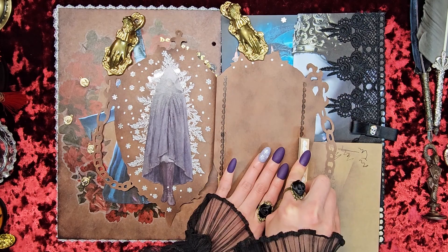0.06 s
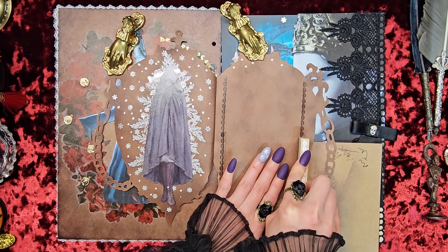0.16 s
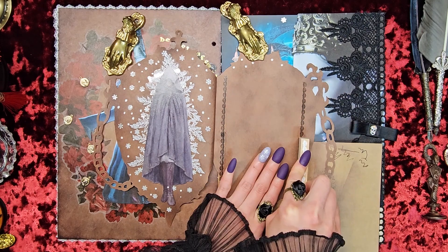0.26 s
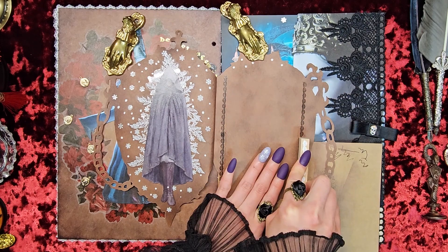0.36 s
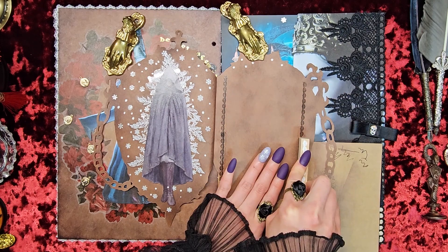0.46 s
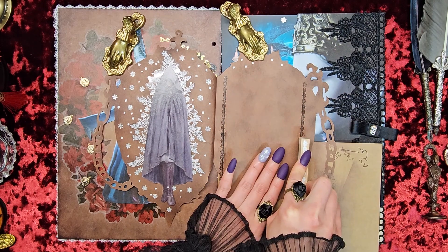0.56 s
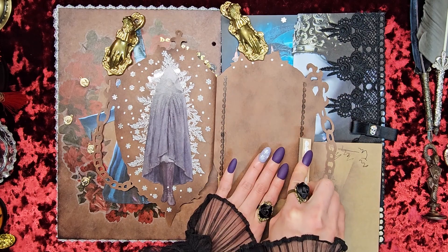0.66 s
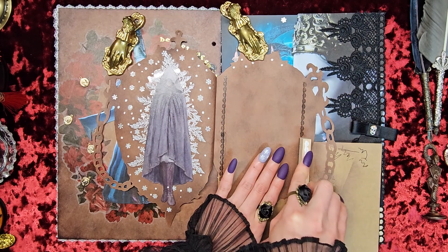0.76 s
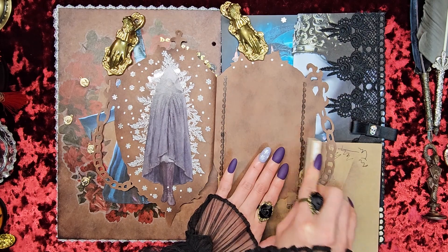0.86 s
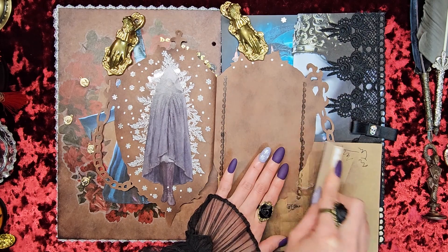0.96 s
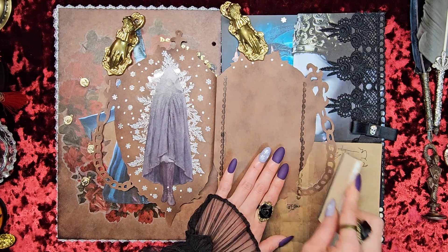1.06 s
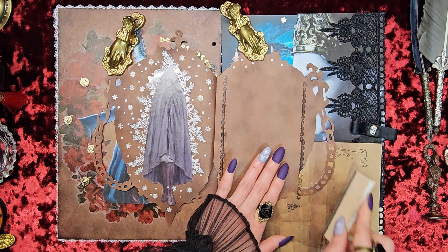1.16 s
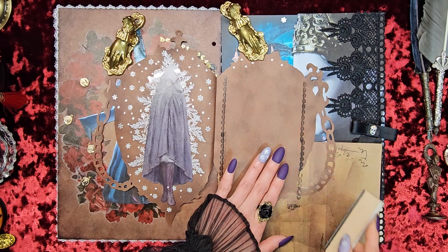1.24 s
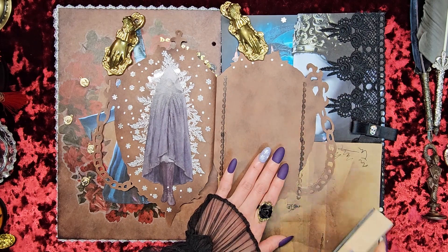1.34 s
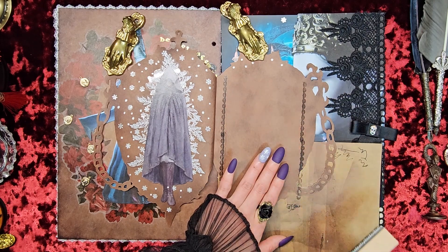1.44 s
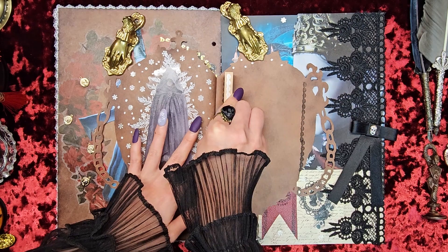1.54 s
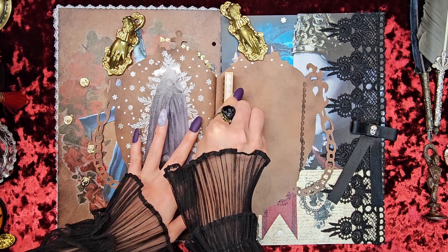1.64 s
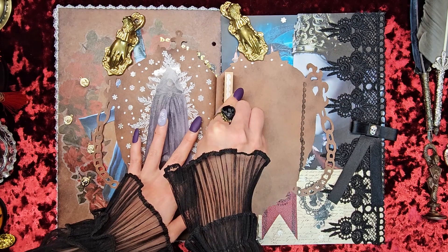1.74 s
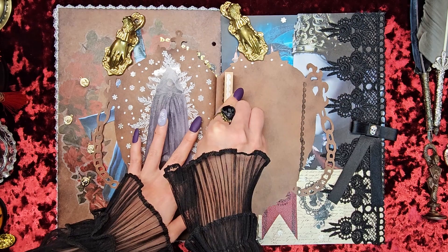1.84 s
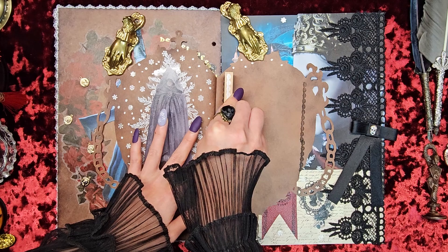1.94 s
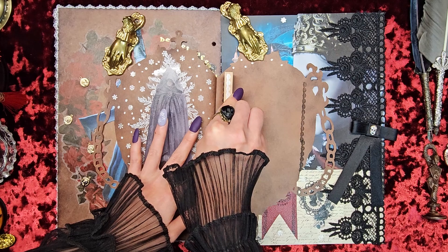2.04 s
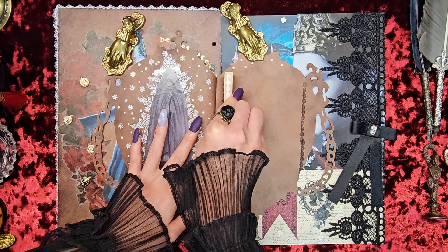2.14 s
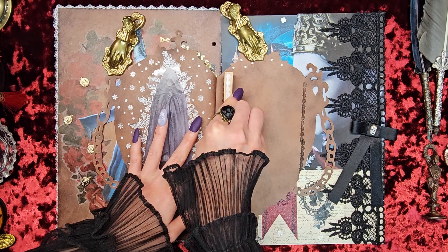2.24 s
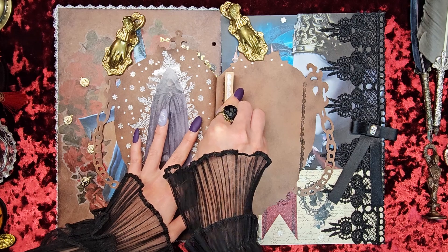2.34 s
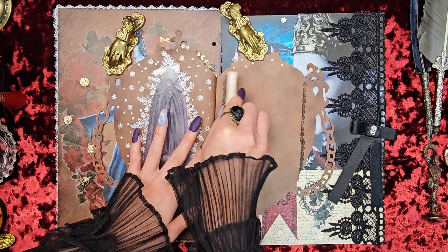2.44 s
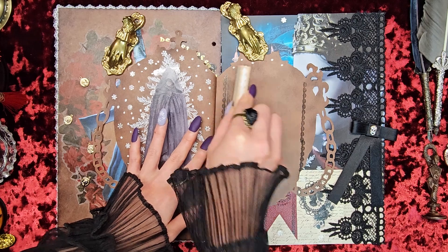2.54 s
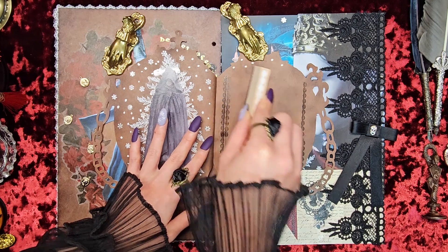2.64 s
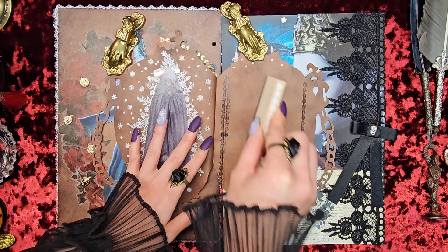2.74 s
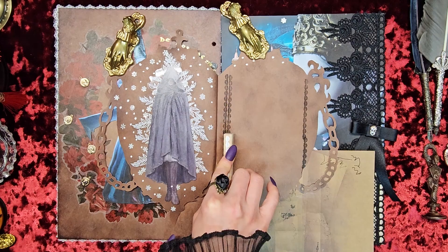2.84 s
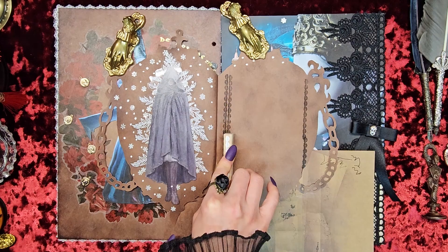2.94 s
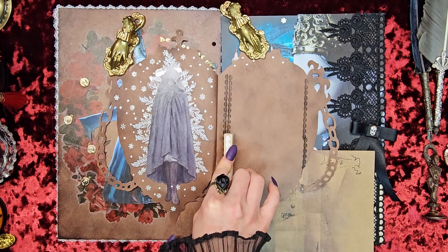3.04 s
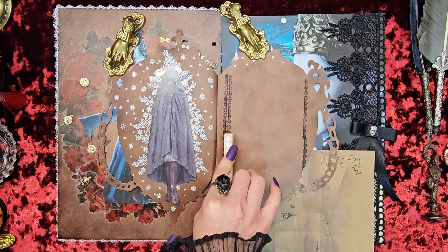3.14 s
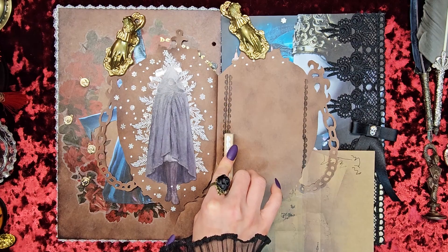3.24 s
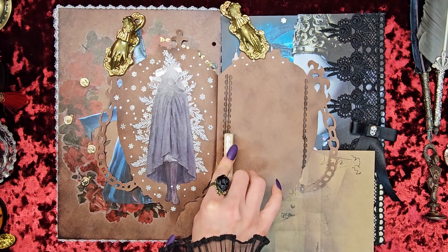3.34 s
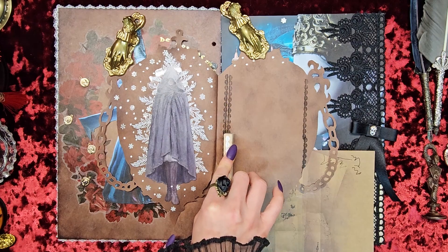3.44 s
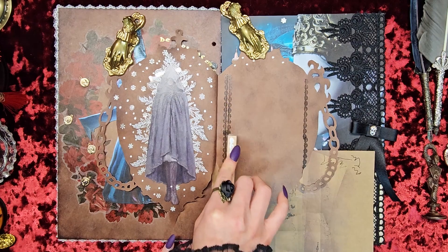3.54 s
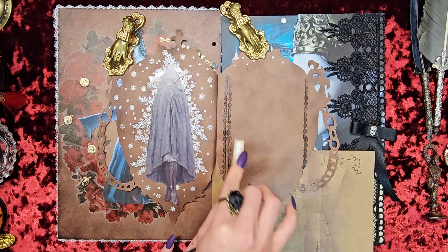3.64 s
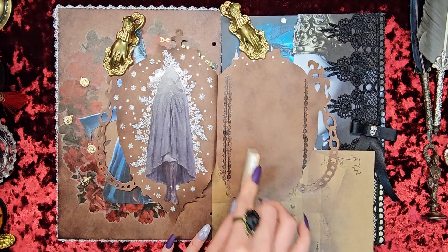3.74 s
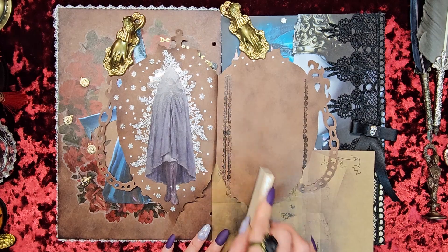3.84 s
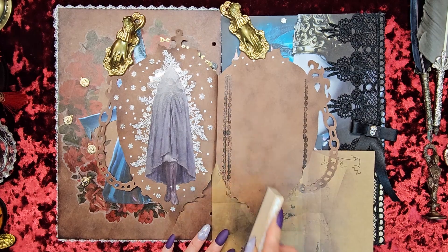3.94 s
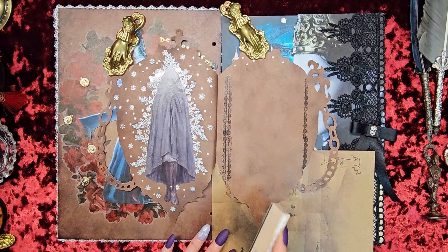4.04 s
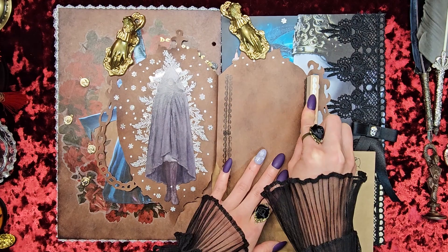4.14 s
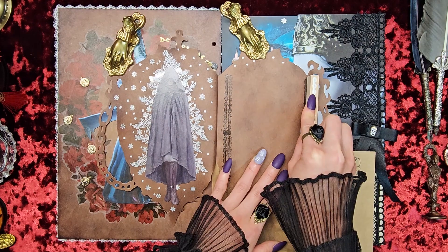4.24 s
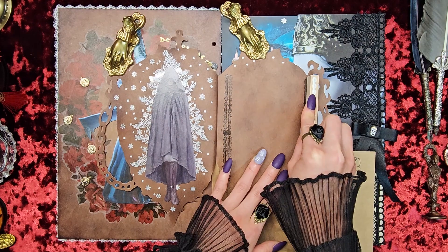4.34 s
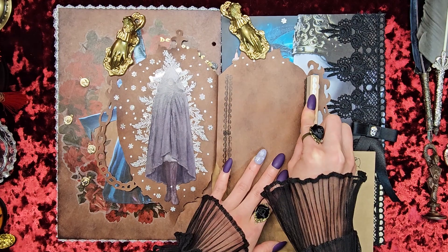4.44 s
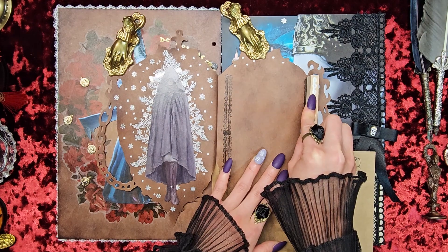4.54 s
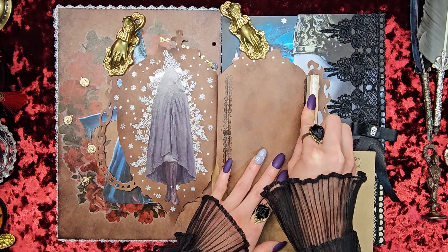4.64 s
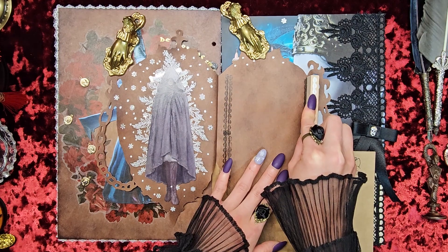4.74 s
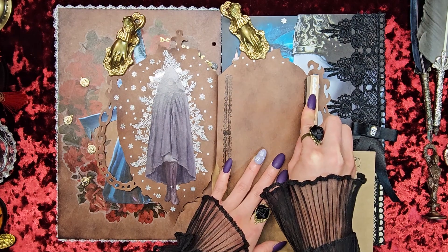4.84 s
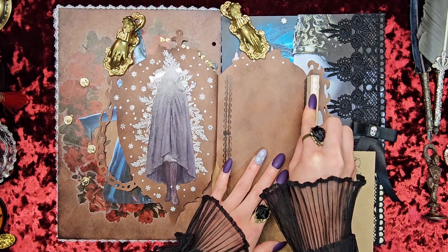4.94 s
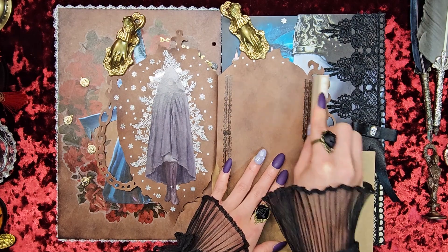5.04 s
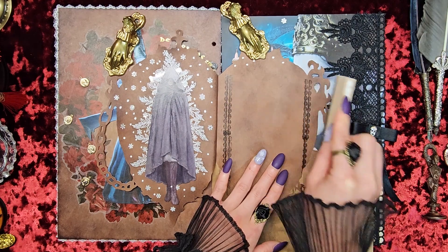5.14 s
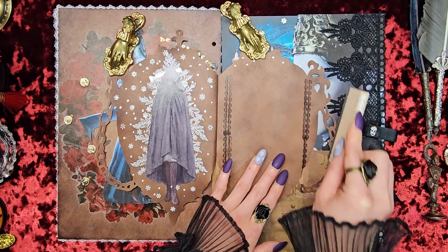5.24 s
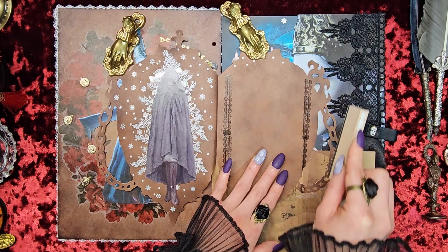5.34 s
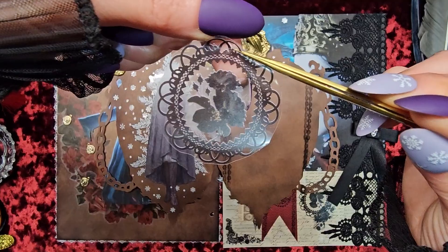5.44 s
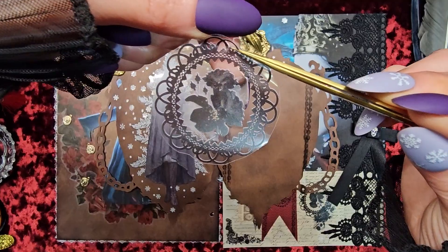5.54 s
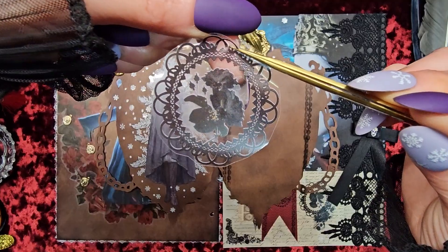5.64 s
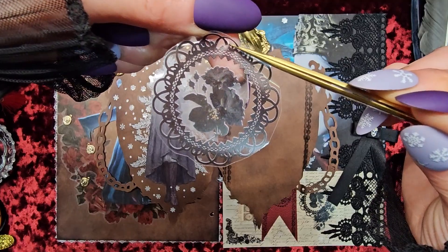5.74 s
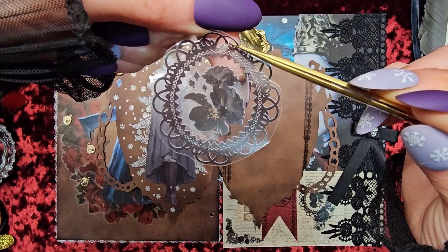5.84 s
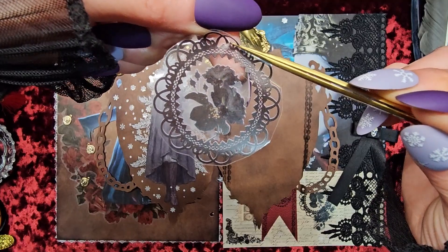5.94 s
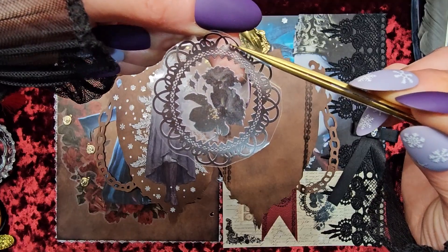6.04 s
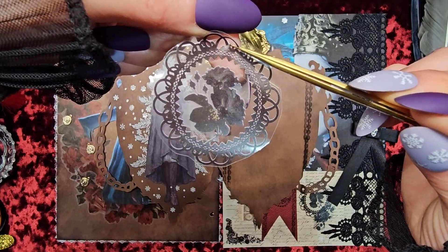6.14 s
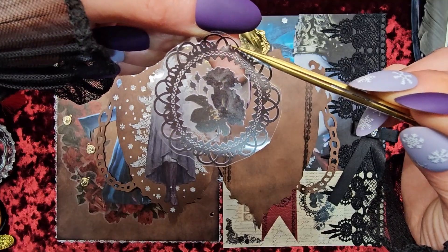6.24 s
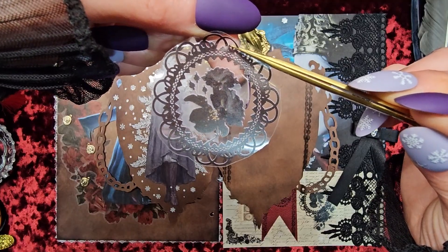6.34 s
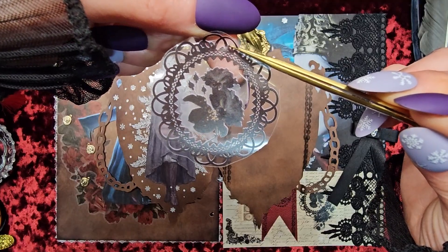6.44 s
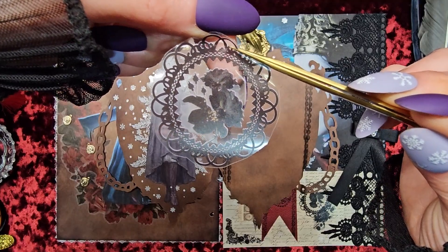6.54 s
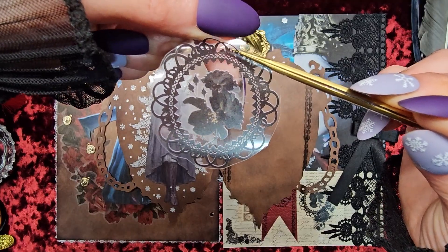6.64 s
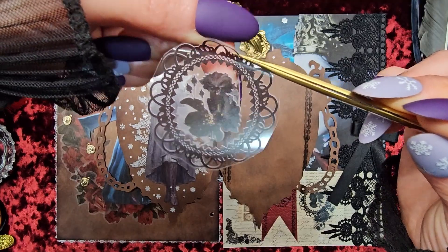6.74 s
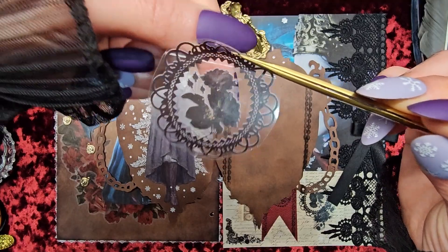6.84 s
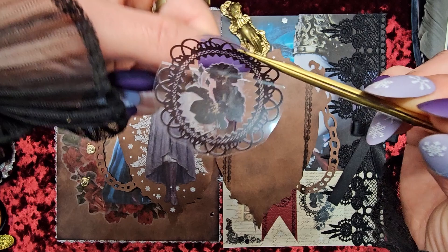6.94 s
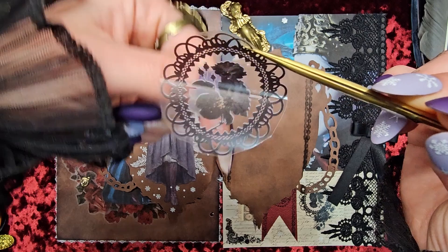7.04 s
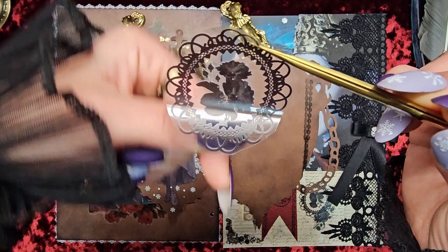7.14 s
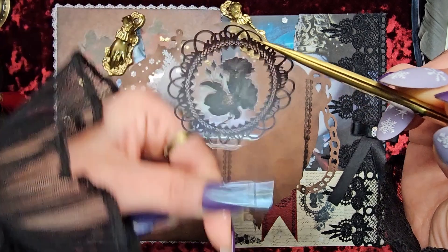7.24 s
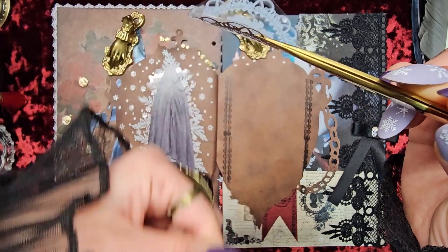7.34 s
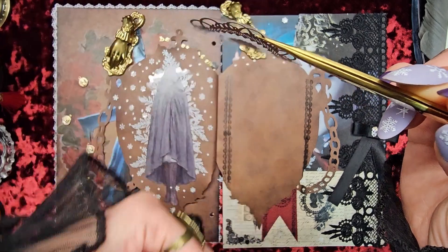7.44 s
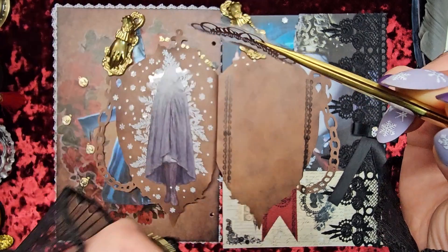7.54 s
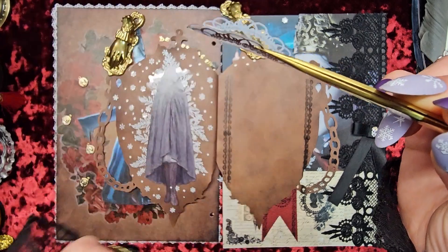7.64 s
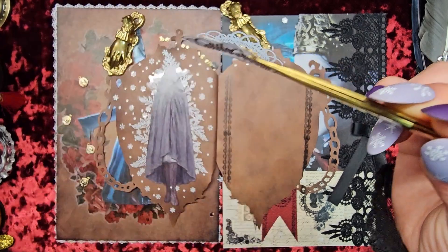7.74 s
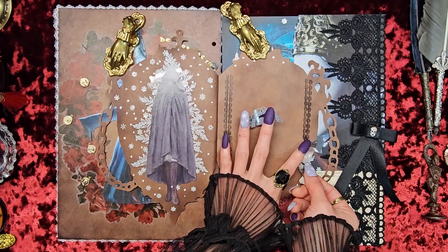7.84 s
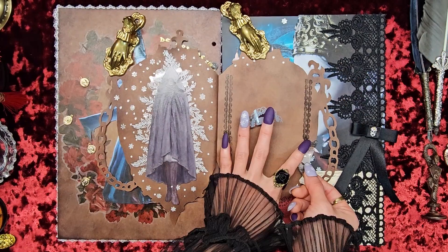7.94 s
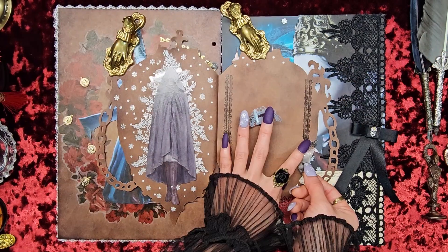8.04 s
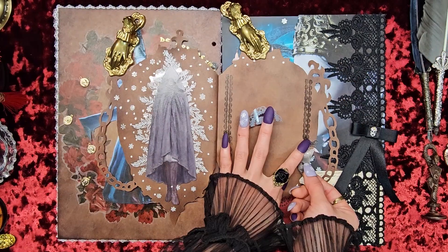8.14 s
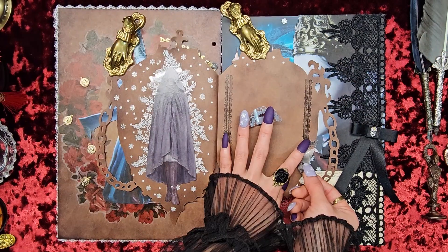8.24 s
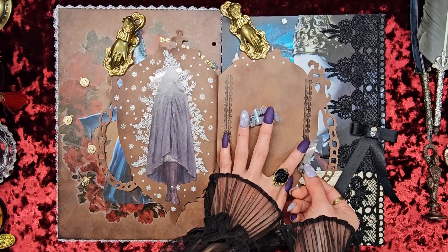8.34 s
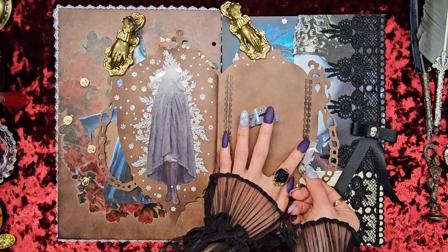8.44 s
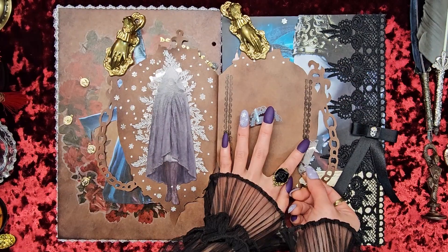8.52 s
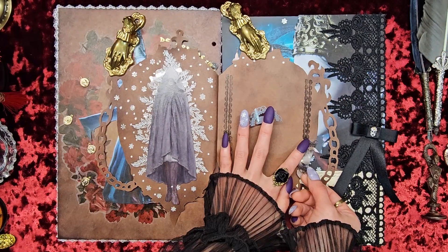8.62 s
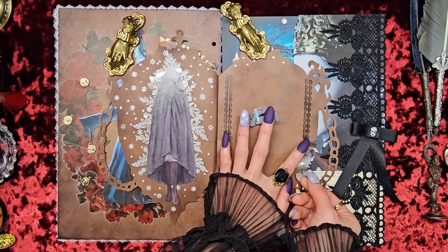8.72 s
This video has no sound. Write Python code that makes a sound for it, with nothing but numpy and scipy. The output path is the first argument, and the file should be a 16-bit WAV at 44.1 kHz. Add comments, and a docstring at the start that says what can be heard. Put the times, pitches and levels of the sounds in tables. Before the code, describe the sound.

A sticky stamp peels off a thick scrapbook page in four dry slaps, then stiff plastic film clicks and snaps over faint hiss.

```python
"""Paper craft close to the microphone in a small, dead room, over a low rumble and a faint hiss (shaped noise).
First a narrow stamp is pressed on a scrapbook page and pulled off four times: tacky ticks and runs of slips
excite the ringing page, which slaps back while the book thuds. Light rubs of noise grains lie between.
Then long nails and tweezers peel a stiff plastic sticker: clicks, crinkles and snaps excite the film's modes.
Scattered echoes from desk and walls follow each handling sound."""
import sys
import numpy as np
from scipy import signal
from scipy.fft import rfft, irfft
from scipy.io import wavfile

SR = 44100
rng = np.random.default_rng(int(sys.argv[2]) if len(sys.argv) > 2 else 0)


def transcribe(u):
    """Save the signal u as a 16-bit wav file named by the first command-line argument.

    u: samples, shape (n,) or (channels, n), limited to [-1, 1]; the rate is SR.
    q: integer samples, one column per channel.
    """
    v = np.clip(np.atleast_2d(u).T, -1, 1)
    q = np.round(v * 32767).astype(np.int16)
    wavfile.write(sys.argv[1], SR, q)


N = 387198
SIZE = 8192  # samples in an impulse response
AGE = np.arange(SIZE) / SR  # seconds since the blow

# Spectral density of room rumble and hiss, relative: frequency_hz, density_db
FLOOR_SPECTRUM = [(8.8, -48), (15, 1), (59, -2), (237, -13.5), (282, -15), (316, -15.5), (377, -17),
                  (714, -21.5), (849, -23.5), (927, -24), (1100, -25), (2210, -29.5), (3850, -32.5),
                  (10600, -35.5), (15500, -36.5)]
# Likeness of left and right in the room's floor: frequency_hz, coherence (0 to 1)
FLOOR_COHERENCE = [(50, 0.78), (130, 0.63), (290, 0.34), (640, 0.16), (1400, .07), (3000, 0)]
FLOOR_SHARED_DB = -44  # level of the part common to both sides
HISS_TOP_HZ, OUTPUT_TOP_HZ = 15750, 16300
OUTPUT_CEILING = .84  # full scale is 1

# Body, crack and tick ranges of a blow: low_hz, high_hz
BLOW_RANGES = [(350, 2000), (2000, 7000), (7000, 16000)]
BLOW_S = .005  # time over which the strength of a blow is set

# Modes of the page: frequency_hz, relative_level_db, t60_s
PAGE_MODES = [(652, -3, .1), (905, -7, .12), (1079, 0, .12), (1157, -5, .12), (1293, -4, .1),
              (1497, -8, .1), (1891, -9, .08), (2850, -12, .06), (6500, -9, .07)]
# Colour of a bare contact on the page: frequency_hz, relative_level_db
PAGE_COLOUR = [(100, 0), (330, 2.5), (520, 1), (650, 6.5), (810, 0.5), (1100, 2), (1500, 3.5), (2200, -4),
               (3400, -9), (5000, -7.5), (9000, -10.5), (16000, -14)]
# Modes of the film: frequency_hz, relative_level_db, t60_s
FILM_MODES = [(1410, -17, 0.061), (2390, 5, 0.073), (3890, -1, 0.079), (5097, -9, .08), (5500, -1, 0.076),
              (5616, -13, .07), (6460, 0, 0.048), (6700, 2, .07), (7340, -11, 0.062), (9900, 9, .05),
              (12900, -5, .08)]
# Colour of a bare contact on the film: frequency_hz, relative_level_db
FILM_COLOUR = [(100, -15), (450, 0), (900, -4.5), (1400, 1), (2000, -4.5), (3100, -5.5), (5300, -1.5),
               (8000, 0), (10500, 0.5), (13000, 0.5), (16000, -5)]

# Single spots of tacky ink let go:
# start_s, level_db, pitch_hz, resonance_boost_db, left_minus_right_db
INK_TACKS = [(.683, -46.5, 4500, 8, 7), (0.8647, -33, 2890, -4, 4), (.8708, -43, 4000, 5, 5),
             (2.388, -54, 4500, 3, 1), (2.5054, -40, 2200, -3, -1), (2.5114, -32.5, 1900, 2, 3),
             (2.541, -32, 2400, -5, 0), (3.5272, -46.5, 1900, 3, 1), (3.558, -36, 2000, 3, 2),
             (3.5836, -41, 2400, -1, 4), (3.64, -45, 1900, 2, 1), (5.034, -42.5, 6400, 20, 11),
             (5.0676, -38.5, 2400, 0, 9)]
# The stamp peels away in a run of slips before each slap:
# start_s, length_s, last_slip_level_db, left_minus_right_db
STAMP_PEELS = [(.873, .009, -34.5, 2), (2.523, 0.015, -38.5, 5), (3.563, .02, -50, 1),
               (5.073, .018, -28, 8)]
PEEL_HZ, PEEL_RISE_DB, PEEL_CYCLES = 3500, 16.5, 9.9
# The stamp comes off and the page slaps back, the second time in two blows;
# where the page is held decides which two resonances speak:
# start_s, body_db, crack_db, tick_db, crackle_ms, left_minus_right_db,
# low_hz, low_boost_db, high_hz, high_boost_db, bump_hz, bump_db
PAGE_SLAPS = [(.884, -30, -29.5, -33, 1.44, 4.5, 1750, 3.5, 6500, 5, 295, -22.5),
              (2.545, -19.5, -24, -35, 1.4, 4, 1000, 13, 1450, 6, 199, -30),
              (2.5541, -18.5, -23.5, -27.5, 3.4, 0, 1120, 7.5, 6000, 5, 250, -33.5),
              (3.5897, -27.5, -30, -38, 1.1, 0.5, 1400, 9, 2080, 7, 410, -38),
              (5.0933, -26, -24.5, -27, 2.1, 3.5, 1120, 5, 6000, 6, 222, -26)]
BUMP_T60_S = 0.032
BOOK_HZ, BOOK_DB = 129, -8.5  # thud of the thick book, dB relative to the body of the slap

# Fingers, paper and film rub: start_s, length_s, centre_hz, level_db
LIGHT_RUBS = [(0.794, 0.1, 4500, -58), (3.49, 0.18, 4000, -57.5), (5.045, 0.04, 5000, -48),
              (6.876, 0.093, 5500, -56), (7.441, 0.065, 7500, -55.5), (8.432, .14, 10000, -57.5)]

# The film snaps through: start_s, body_db, crack_db, tick_db, crackle_ms, left_minus_right_db,
# low_hz, low_boost_db, high_hz, high_boost_db, bump_hz, bump_db, flick_db
FILM_SNAPS = [(6.799, -29.5, -36.5, -23, 1.3, 3.5, 950, 7, 13500, 9, 560, -46, -24.5),
              (7.3336, -27.5, -16.5, -17.5, 4.7, 2.5, 805, 7, 5360, 4.5, 380, -33, -25),
              (7.5776, -40.5, -25, -28, 8.5, 2.5, 794, 5, 6500, 6, 440, -30.5, -32),
              (8.6288, -33.5, -32, -36, .8, 3.5, 860, 7, 2940, 7, 230, -34, -20.5)]
# The film's edge flicks off the nail just before the whole sheet buckles
FLICK_HZ, BUCKLE_DELAY_S = 11100, 0.00121
# Nails and tweezers click on the film:
# start_s, level_db, pitch_hz, resonance_boost_db, left_minus_right_db
NAIL_CLICKS = [(6.8693, -36.5, 2720, 10, 1), (6.907, -44.5, 10000, 3, 3), (6.9906, -47.5, 5800, 12, 2),
               (7.2008, -33, 10500, -1, 6), (7.247, -44.5, 900, 3, 2), (7.27, -37.5, 700, 5, 4),
               (7.317, -29, 10000, -1, 3), (7.698, -42, 11200, 7, 4), (8.129, -46, 1500, 7, 5)]
# The film crinkles as it bends: start_s, length_s, last_slip_level_db, left_minus_right_db
FILM_CRINKLES = [(6.924, .049, -52, 2), (7.297, 0.017, -46.5, 4)]
CRINKLE_HZ, CRINKLE_RISE_DB, CRINKLE_CYCLES = 6000, 3, 7.1
# Held close, the film's treble reaches the two microphone ports out of step:
# frequency_hz, left_lead_rad
PORT_PHASE = [(6000, 0.6), (8000, 1.1), (16000, 1.6)]
LOWERED_S = 7.5  # from here the film is down on the page

# A light tick is strongest near its pitch; its crackle decays over a few cycles of that pitch
TICK_FALL_DB_PER_OCTAVE, TACK_CYCLES, CLICK_CYCLES = 4.5, 2.1, 2.8
# Slips are uneven in time (share of run length / slip count) and in strength
SLIP_JITTER, SLIP_SCATTER_DB = .12, 2


def undb(db):
    """Decibels to amplitude ratio."""
    return 10 ** (np.asarray(db) / 20)


def rms(x):
    """Root mean square."""
    return np.sqrt(np.mean(x ** 2)) + 1e-12


def along(points, hz):
    """Interpolation of (frequency, value) points on a logarithmic frequency axis."""
    f, value = np.transpose(points)
    return np.interp(np.log(hz + 1e-3), np.log(f), value)


def band(x, lo_hz, hi_hz):
    """Zero-phase band-pass: filtering both ways cancels the delay."""
    sos = signal.butter(2, [lo_hz, min(hi_hz, .45 * SR)], "band", fs=SR, output="sos")
    return signal.sosfiltfilt(sos, x, padtype=None)


def add(out, s, sound):
    """Superposition of a sound at time s."""
    i = int(s * SR)
    out[:, i:i + sound.shape[-1]] += sound[..., :N - i]


def fade(t60):
    """Exponential decay by 60 dB in t60 seconds."""
    return np.exp(-np.log(1000) * AGE / t60)


def convolve(x, response):
    """Linear response by convolution along time, keeping the length."""
    return signal.fftconvolve(x, np.atleast_2d(response), axes=1)[:, :x.shape[1]]


def floor():
    """Partial coherence: rumble largely shared by both sides, and hiss that is independent at each."""
    hz = np.fft.rfftfreq(N, 1 / SR)
    colour = undb(along(FLOOR_SPECTRUM, hz)) * (hz < HISS_TOP_HZ)
    coherence = np.clip(along(FLOOR_COHERENCE, hz), 0, 1)

    def noise(power):
        return irfft(rfft(rng.standard_normal(N)) * colour * np.sqrt(power), N)

    mid = noise(1 + coherence)
    side = noise(1 - coherence)
    return undb(FLOOR_SHARED_DB) * np.array([mid + side, mid - side]) / rms(mid)


def sheet(grips, colour, modes, ring_db, q):
    """Modal response: a minimum-phase crack and decaying modes, boosted at the (Hz, dB) grip resonances."""
    # folding the cepstrum gives the crack its minimum phase
    cepstrum = irfft(np.log(undb(along(colour, np.fft.rfftfreq(SIZE, 1 / SR)))))
    cepstrum[1:SIZE // 2] *= 2
    cepstrum[SIZE // 2 + 1:] = 0
    crack = irfft(np.exp(rfft(cepstrum)))
    ring = np.zeros(SIZE)
    for hz, db, t60 in modes:
        detuned_hz = hz * (1 + 0.006 * rng.standard_normal())
        ring += undb(db) * fade(t60) * np.sin(2 * np.pi * detuned_hz * AGE)
    response = crack / rms(crack) + undb(ring_db) * ring / rms(ring)
    for hz, db in grips:
        resonance = signal.lfilter(*signal.iirpeak(min(hz, .45 * SR), q, fs=SR), response)
        response = response + (undb(db) - 1) * resonance
    return response


def snap(blow, response, grit, scatter, width):
    """Stick-slip release: a sharp jolt, then a dying crackle of tiny slips spread over the sheet."""
    *levels_db, crackle_ms, pan_db = blow
    progress = 1000 * AGE / max(crackle_ms, .1)
    strength = np.exp(scatter * rng.standard_normal(SIZE) - scatter ** 2)
    grains = rng.standard_normal((3, SIZE)) * strength
    envelope = np.exp(-progress) * (1 - np.exp(-progress / 0.081))
    # one crackle common to both sides, and one for each side alone
    push = grit * (grains[0] + width * grains[1:]) * envelope
    # the slower the release, the less of it goes into the first jolt
    push[:, 0] = 1 / (1 + (crackle_ms / 3.5) ** 2)
    lead = int(BLOW_S * SR)
    sound = np.pad(convolve(push, response), ((0, 0), (lead, 0)))
    # how hard and how sharp the contact is sets the strength of each range during the blow
    shaped = 0
    for db, (lo_hz, hi_hz) in zip(levels_db, BLOW_RANGES):
        part = band(sound, lo_hz, hi_hz)
        # root 2: half of this window is the silent lead
        shaped = shaped + undb(db) * part / (np.sqrt(2) * rms(part[:, :2 * lead]))
    sides = undb(np.array([[pan_db], [-pan_db]]) / 2)
    return shaped * sides / rms(sides)


def tick(db, hz, cycles, pan_db):
    """Short light impact: ranges weaken with distance from the pitch, and higher ticks are shorter."""
    centres_hz = np.sqrt(np.prod(BLOW_RANGES, axis=1))
    octaves = np.abs(np.log2(centres_hz / hz))
    crackle_ms = 1000 * cycles / hz
    return (*(db - TICK_FALL_DB_PER_OCTAVE * octaves), crackle_ms, pan_db)


def slips(runs, hz, rise_db, cycles, count):
    """Stick-slip: runs of uneven light blows that grow as the pull builds; gives (s, blow) for each."""
    for s, length, db, pan_db in runs:
        for progress in np.linspace(0, 1, count):
            late, strong = rng.standard_normal(2)
            level_db = db - rise_db * (1 - progress) + SLIP_SCATTER_DB * strong
            slip_s = s + length * (progress + SLIP_JITTER * late / count)
            yield slip_s, tick(level_db, hz, cycles, pan_db)


def bump(hz, db):
    """Heavily damped oscillator: the dull answer of the thick book, or of the hand holding the sheet."""
    swing = fade(BUMP_T60_S) * (1 - np.exp(-AGE / 0.0007))
    return -undb(db) * swing * np.sin(2 * np.pi * hz * AGE)


def page(blow, grips):
    """Impact on paper: a blow excites the modes of the page."""
    response = sheet(grips, PAGE_COLOUR, PAGE_MODES, ring_db=-12.5, q=9.1)
    return snap(blow, response, grit=0.25, scatter=0.74, width=0.58)


def stamp():
    """Adhesive release and impact: ink ticks, the stamp peels away, the page slaps and the book thuds."""
    out = np.zeros((2, N))
    for s, db, hz, boost_db, pan_db in INK_TACKS:
        add(out, s - BLOW_S, page(tick(db, hz, TACK_CYCLES, pan_db), [(hz, boost_db)]))
    for s, blow in slips(STAMP_PEELS, PEEL_HZ, PEEL_RISE_DB, PEEL_CYCLES, count=5):
        add(out, s - BLOW_S, page(blow, []))
    for s, *blow, low_hz, low_db, high_hz, high_db, bump_hz, bump_db in PAGE_SLAPS:
        body_db = blow[0]
        add(out, s - BLOW_S, page(blow, [(low_hz, low_db), (high_hz, high_db)]))
        add(out, s, bump(bump_hz, bump_db) + bump(BOOK_HZ, body_db + BOOK_DB))
    return out


def rubs():
    """Friction noise: fine grains that catch unevenly, swell and die away."""
    out = np.zeros((2, N))
    for s, length, hz, db in LIGHT_RUBS:
        n = int(length * SR)
        catches = np.repeat(undb(6 * rng.standard_normal(n // 64 + 1)), 64)[:n]
        grains = band(rng.standard_normal((2, n)) * catches, hz * 0.29, hz * 2.25)
        grains = grains * np.sqrt(np.hanning(n))
        add(out, s, undb(db) * grains / rms(grains))
    return out


def film(blow, grips):
    """Impact on stiff plastic: a blow excites the modes of the film."""
    response = sheet(grips, FILM_COLOUR, FILM_MODES, ring_db=-28.5, q=11.0)
    return snap(blow, response, grit=0.4, scatter=0.48, width=0.77)


def ports(sound):
    """Interaural-type phase difference: the right port hears the treble of a very near source late."""
    n = sound.shape[1]
    turn = np.exp(-1j * along(PORT_PHASE, np.fft.rfftfreq(n, 1 / SR)))
    return np.array([sound[0], irfft(rfft(sound[1]) * turn, n)])


def sticker():
    """Snap-through buckling: film flicks off nails and tweezers, first held close, then down on the page."""
    out = np.zeros((2, N))
    blows = []
    for s, db, hz, boost_db, pan_db in NAIL_CLICKS:
        blows.append((s, tick(db, hz, CLICK_CYCLES, pan_db), [(hz, boost_db)]))
    for s, blow in slips(FILM_CRINKLES, CRINKLE_HZ, CRINKLE_RISE_DB, CRINKLE_CYCLES, count=4):
        blows.append((s, blow, []))
    for s, *buckle, low_hz, low_db, high_hz, high_db, bump_hz, bump_db, flick_db in FILM_SNAPS:
        grips = [(low_hz, low_db), (high_hz, high_db)]
        flick = tick(flick_db, FLICK_HZ, CLICK_CYCLES, pan_db=buckle[-1])
        blows += [(s, flick, grips), (s + BUCKLE_DELAY_S, buckle, grips)]
        add(out, s + BUCKLE_DELAY_S, bump(bump_hz, bump_db))
    for s, blow, grips in blows:
        sound = film(blow, grips)
        add(out, s - BLOW_S, ports(sound) if s < LOWERED_S else sound)
    return out


def reflections(x, wet_db, t60, build_s, top_hz):
    """Diffuse reflection: scattered echoes, different on each side, that build up and die away."""
    tail = rng.standard_normal((2, SIZE)) * fade(t60) * (1 - np.exp(-(AGE / build_s) ** 2))
    tail = signal.sosfilt(signal.butter(2, min(top_hz, .45 * SR), fs=SR, output="sos"), tail)
    return undb(wet_db) * convolve(x, tail / (rms(tail) * np.sqrt(SIZE)))


def scene():
    """Superposition of the handling sounds, their echoes from desk and walls, and the room's floor."""
    handling = stamp() + rubs() + sticker()
    desk = reflections(handling, wet_db=-13.5, t60=0.018, build_s=0.0018, top_hz=15000)
    walls = reflections(handling, wet_db=-12.0, t60=0.11, build_s=0.0055, top_hz=12900)
    return floor() + handling + desk + walls


def record(dry):
    """Soft saturation and band limiting: the very highest peaks are rounded and the top is cut."""
    rounded = dry / (1 + (dry / OUTPUT_CEILING) ** 8) ** (1 / 8)
    return signal.sosfilt(signal.ellip(8, .2, 70, OUTPUT_TOP_HZ, fs=SR, output="sos"), rounded)


dry = scene()
out = record(dry)
transcribe(out)
```